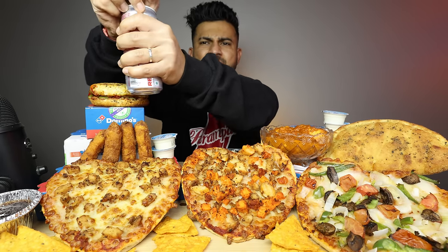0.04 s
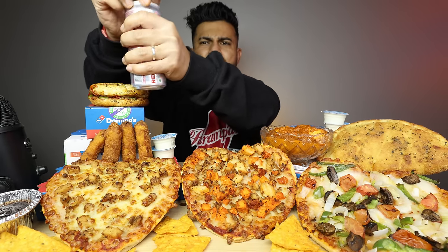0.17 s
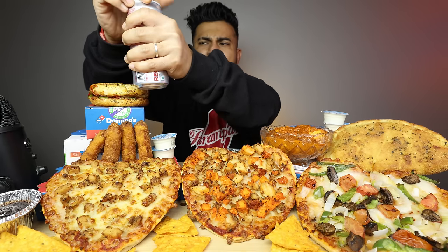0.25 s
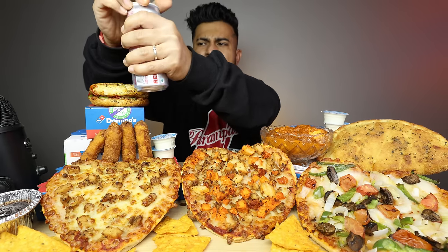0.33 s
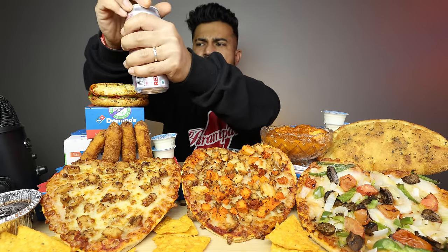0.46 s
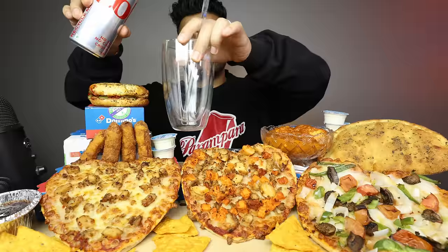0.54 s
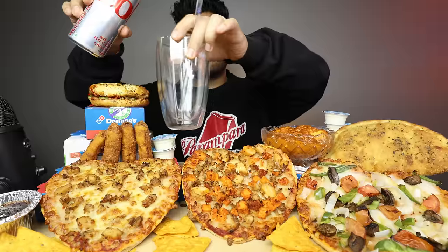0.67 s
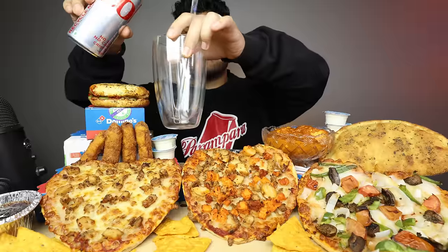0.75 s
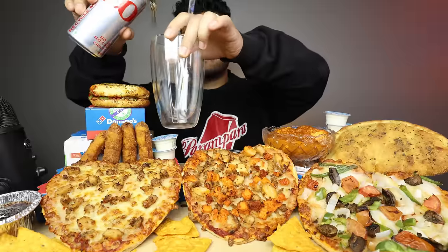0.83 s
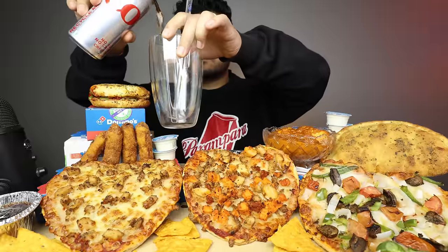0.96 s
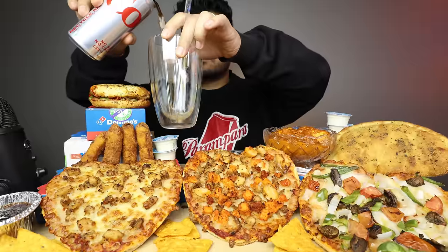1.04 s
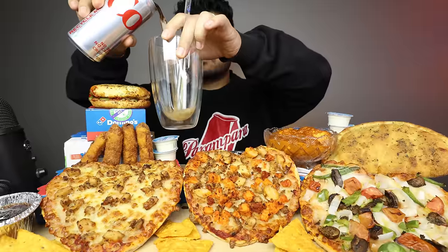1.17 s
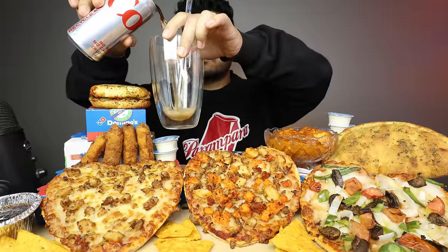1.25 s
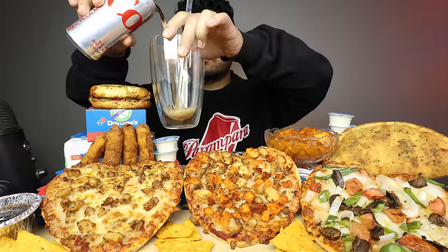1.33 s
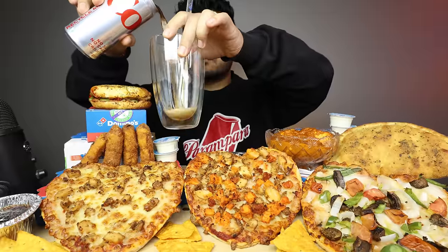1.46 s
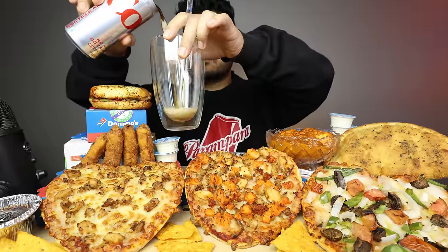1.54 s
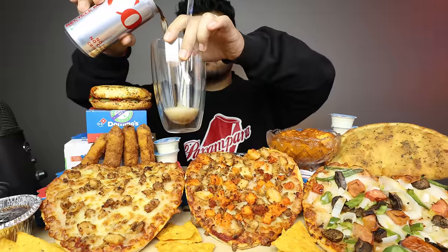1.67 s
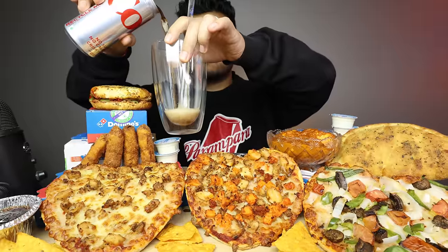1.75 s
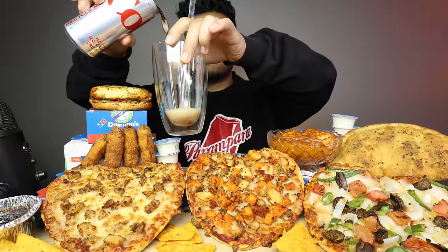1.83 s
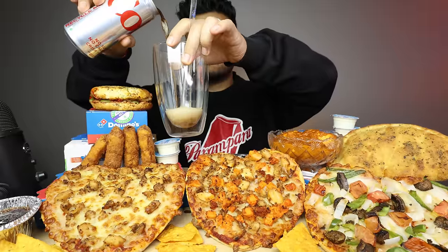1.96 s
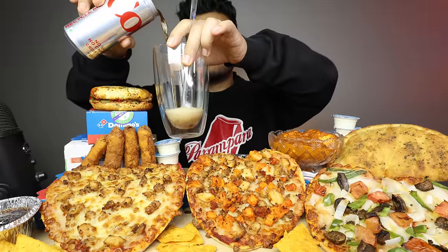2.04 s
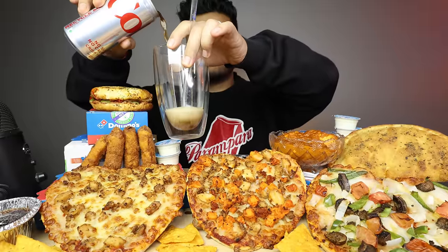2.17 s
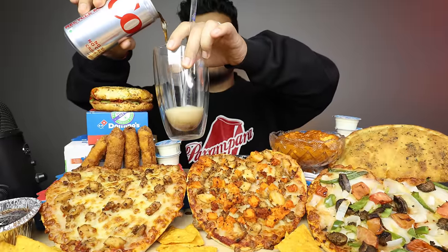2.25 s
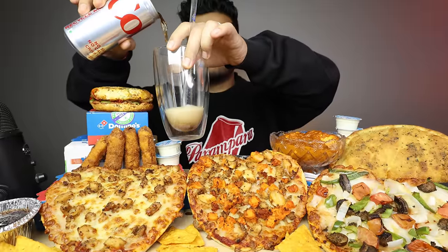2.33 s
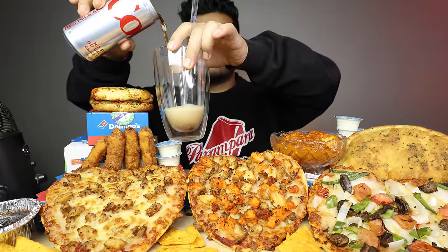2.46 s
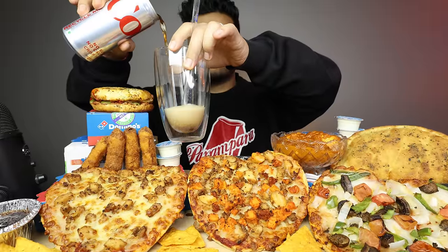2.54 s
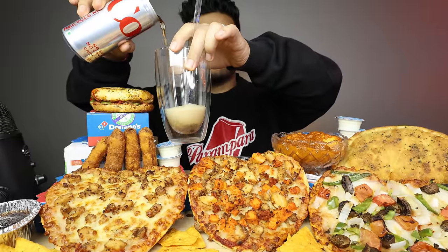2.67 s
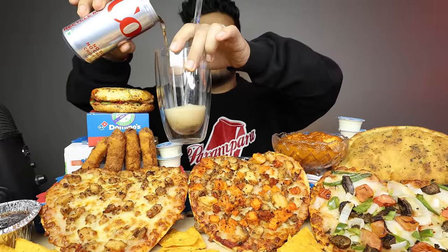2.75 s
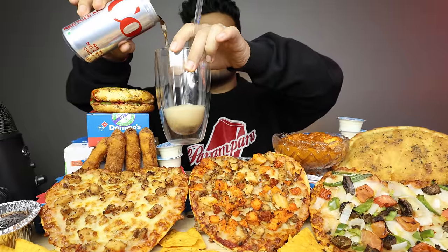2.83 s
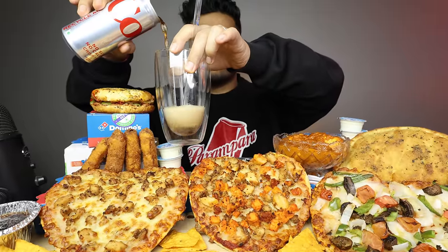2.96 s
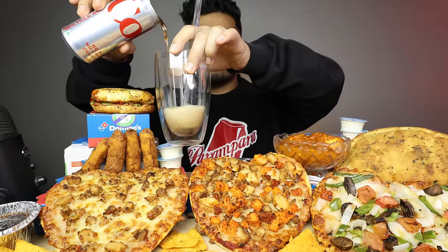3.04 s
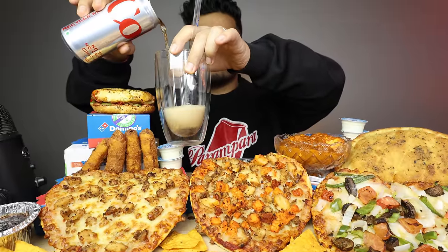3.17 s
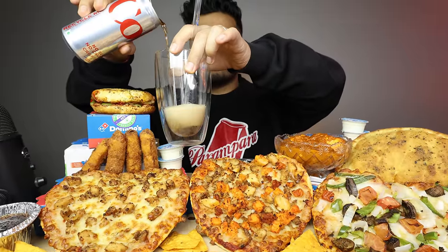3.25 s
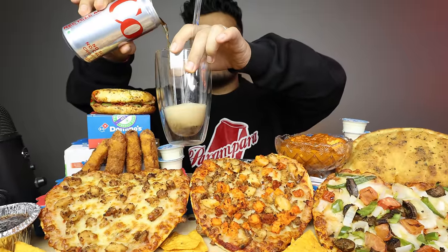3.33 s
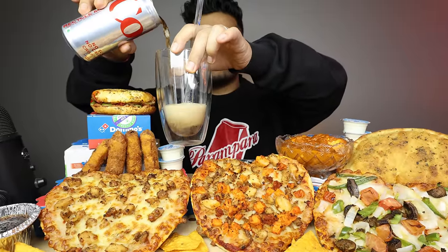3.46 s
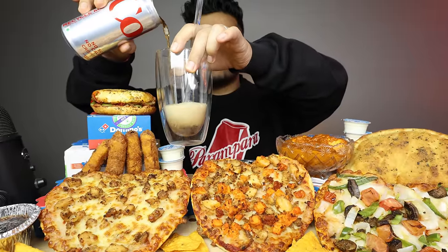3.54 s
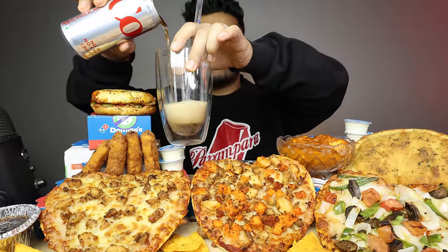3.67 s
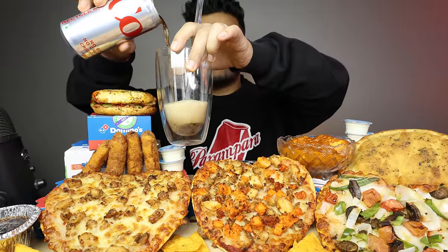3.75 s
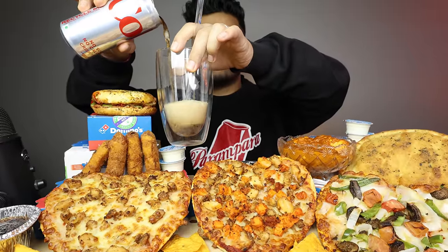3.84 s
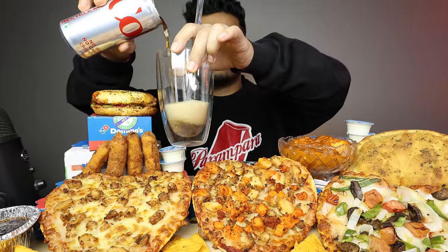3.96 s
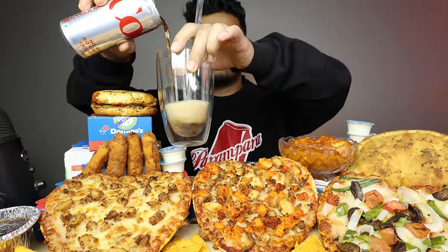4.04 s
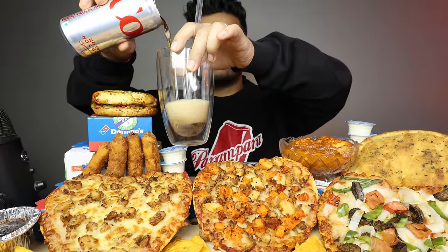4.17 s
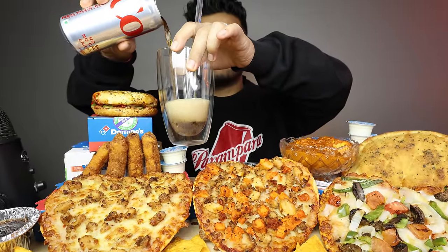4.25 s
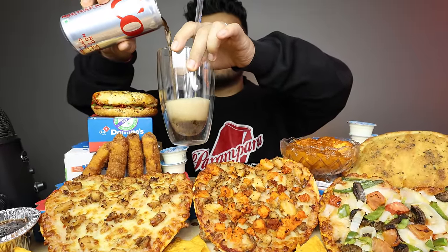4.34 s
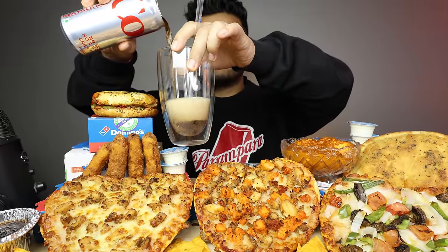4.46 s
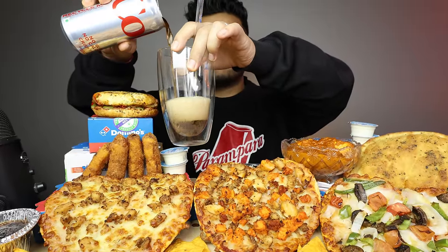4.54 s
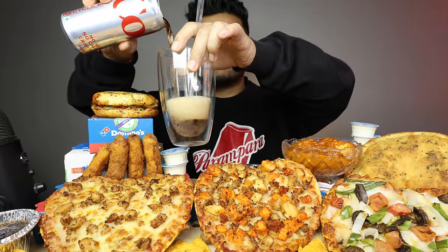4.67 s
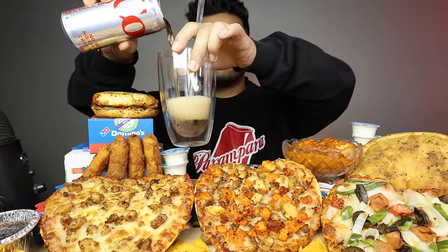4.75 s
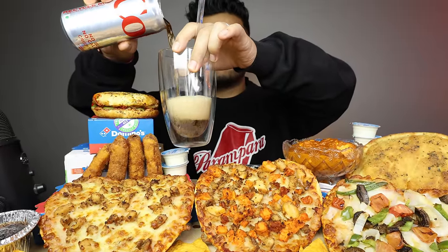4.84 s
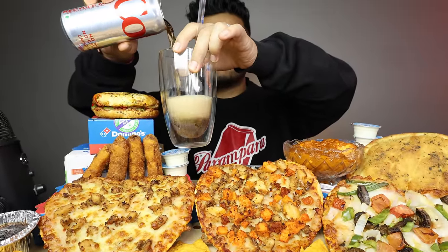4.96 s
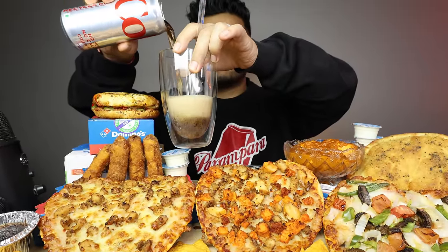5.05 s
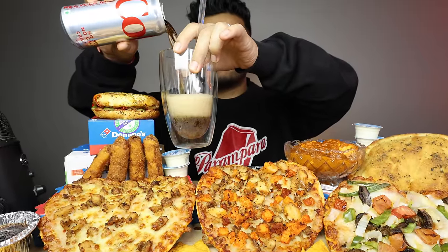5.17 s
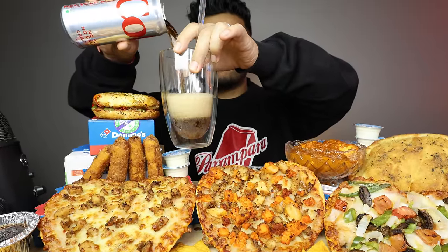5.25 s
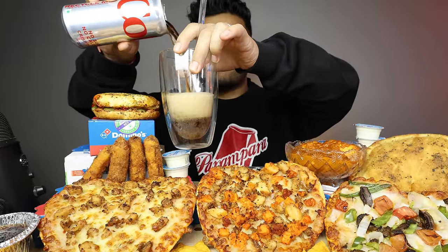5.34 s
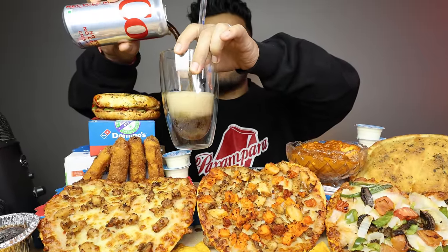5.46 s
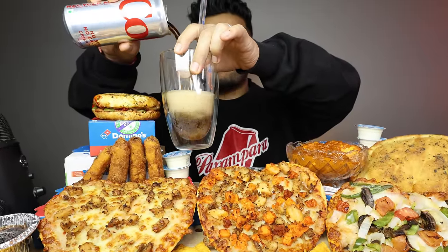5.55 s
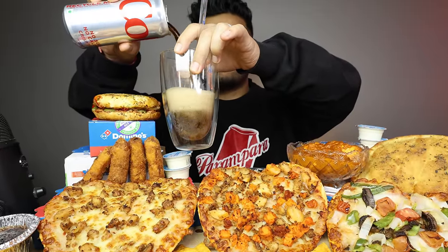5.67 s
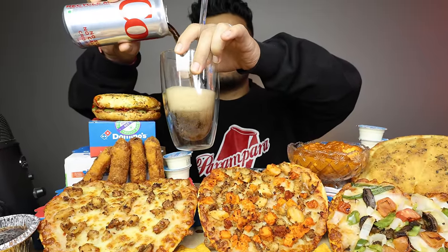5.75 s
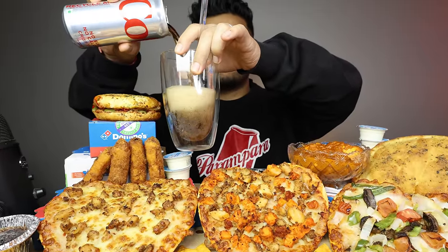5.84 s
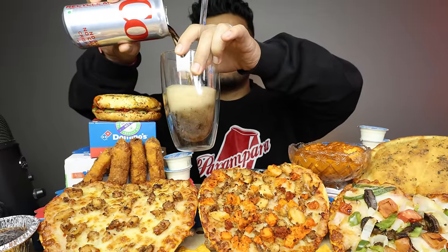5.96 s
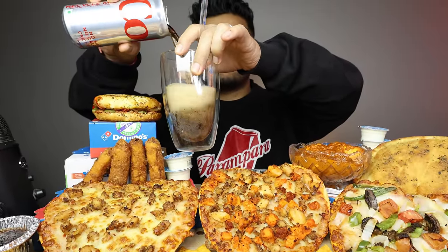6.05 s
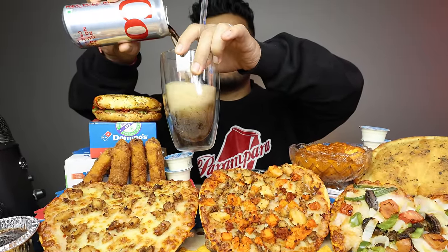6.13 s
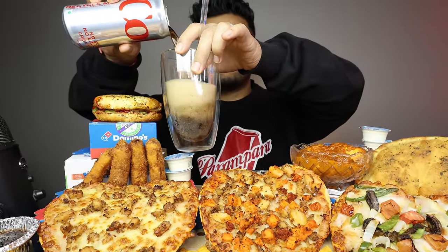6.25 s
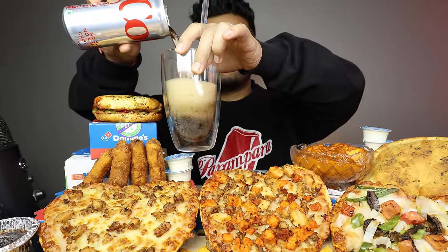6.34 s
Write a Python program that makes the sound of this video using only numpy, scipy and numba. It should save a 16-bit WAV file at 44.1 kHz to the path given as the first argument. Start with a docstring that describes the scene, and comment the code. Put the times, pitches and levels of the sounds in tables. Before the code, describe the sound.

A pressurised can bursts with a short bright hiss, ticks, then cracks open very loudly, stopping abruptly. Following a pause, a thin stream patters on bare glass, then lumpy hollow plops come thick and fast, gradually sparser, shorter and higher as the glass fills. Carbonation crackles and brightens until the end. Close, dry microphone, slightly overloaded on the crack, over quiet indoor rumble.

```python
"""A drink can opens with a hiss of shaped noise, its lid snaps as dying tones and tears as dense clicks, then stops
abruptly. Later a drink is poured into a tall glass: spatter and drops tick on it, lumps plop by exciting a resonant
air column that rings higher as the glass fills, and a hiss of bubble clicks grows brighter as the foam rises.
A straw then clinks once as a set of damped modes; the foam shortens the ringing of the plops.
A quiet rumble and mains hum last throughout; overload clips the peaks and a low-pass removes the top."""
import sys
import numpy as np
from scipy import signal
from scipy.fft import rfft, irfft
from scipy.io import wavfile
from numba import njit

SR = 44100
rng = np.random.default_rng(int(sys.argv[2]) if len(sys.argv) > 2 else 0)


def to_wav(sig):
    """Store sig (one row per channel, or 1-D mono) as 16-bit WAV at the path in sys.argv[1].

    Samples outside -1..1 are clipped; the rate is SR.
    """
    pcm = np.clip(np.atleast_2d(sig), -1, 1) * 32767
    pcm = np.round(pcm).astype(np.int16)
    wavfile.write(sys.argv[1], SR, pcm.T)  # frames by channels


N = 282240

# Spectrum of the room rumble: f/Hz, relative level/dB per Hz
ROOM_SPECTRUM = [(12, -41), (20, -9), (90, -9), (133, -15.5), (180, -12.5), (267, -16.5), (1000, -27),
                 (15500, -39.5)]
# Mains hum: f/Hz, mean level/dB rms
MAINS_HUM = [(49, -53.5)]
# Spectrum of the opening hiss: f/Hz, relative level/dB per Hz
VENT_SPECTRUM = [(300, -19.5), (620, -5.5), (985, -7), (1800, 0), (2500, -6.5), (3500, -4.5), (4100, 1.5),
                 (5700, -3), (6400, -1), (7500, -1.5), (10500, -14.5), (15500, -23)]
# Can resonances in the hiss: f/Hz, width/Hz, relative level/dB
CAN_MODES = [(1860, 130, 0), (4190, 24, 2), (5100, 32, 0), (5800, 38, -3.5), (6700, 41, -1)]
# Hiss by band: low f/Hz, high f/Hz, burst level/dB, fall/(dB per s), seeping level/dB, second puff level/dB
HISS_BANDS = [(200, 3440, -12, 130, -44, -44), (3630, 8130, -3.5, 151, -42, -38),
              (7200, 10500, -6, 171, -39, -32), (10500, 14400, -12, 256, -55, -40)]
# Tab and lid snapping: t/s, level/dB of the tone at its onset, f/Hz
LID_SNAPS = [(0.1637, -14.5, 2180), (0.1768, -15, 1890), (0.3665, -27, 1070), (0.4414, -4.5, 3080),
             (0.4495, -6, 3300), (0.4725, 11, 2940), (0.4775, 9, 1454)]
# Spectrum of the tearing lid: f/Hz, relative level/dB per Hz
TEAR_SPECTRUM = [(400, -32), (1050, 0), (1280, 3), (1690, 4.5), (2330, -7), (3210, -11.5), (5570, -21),
                 (7120, -12.5), (15500, -39)]
# Lowest resonance of the air above the drink: t/s, f/Hz
AIR_RESONANCE = [(1.1, 655), (1.9, 648), (2.4, 745), (4.4, 794), (5.4, 980), (6.4, 1220)]
# Force of the stream as heard through the foam: t/s, spray level/dB
STREAM_FORCE = [(1.1, -53), (1.29, -32), (1.44, -24.5), (1.66, -31.5), (2.16, -34.5), (2.9, -35.5),
                (3.24, -34), (3.55, -39.5), (4.2, -37), (4.6, -45), (5.3, -48), (6.4, -52.5)]
# Spectrum of the spray: f/Hz, relative level/dB per Hz
SPRAY_SPECTRUM = [(700, -6.5), (1100, -5), (2100, -2), (5000, -16), (8000, -9.5), (15500, -42)]
# Drops bursting on the glass: t/s, level/dB of the tone at its onset, f/Hz
GLASS_DROPS = [(1.1147, -13.5, 9100), (1.1424, -19, 8900), (1.1822, -8.5, 9000), (1.1966, -13, 2040),
               (1.2763, -13, 8900), (1.2919, -14, 3040), (1.3209, -12, 3080), (1.356, -8.5, 1760),
               (1.3727, -21, 2940), (1.3972, -9, 2260), (1.4074, -8.5, 1830), (1.486, -19, 3120),
               (1.5513, -9, 1980), (1.6198, -12.5, 1850), (1.6488, -10, 1900), (2.353, -18, 4080),
               (2.38, -17, 2270), (2.3939, -12, 2127), (2.4548, -12, 2080), (2.6063, -13, 4530),
               (2.6981, -18, 4500), (2.7551, -14, 2070), (2.7733, -11.5, 2350), (3.0053, -9.5, 2230),
               (3.051, -15, 2220), (3.2146, -13, 2300), (3.273, -13, 2300), (3.932, -18, 3830)]
# Overtones of the air column, a tube closed at one end: multiple of the lowest f, level/dB
AIR_OVERTONES = [(2.952, -30.5), (4.9, -35.5), (6.6, -26.5)]
# Cancellations by echoes off the table: f/Hz, width/Hz
TABLE_DIPS = [(450, 58), (1550, 357), (1960, 170), (5950, 180)]
# Lumps of the stream landing: t/s, level/dB of the blow
LUMP_LANDINGS = [(1.1724, -12), (1.3554, -10.5), (1.3972, -14), (1.4552, -7), (1.5028, -9.5),
                 (1.5254, -10.5), (1.554, 1), (1.5786, -2), (1.5932, -2.5), (1.62, -5), (1.6382, -4.5),
                 (1.649, -4), (1.6873, -2.5), (1.706, -8), (1.732, -3), (1.74, 7.5), (1.76, -1.5),
                 (1.793, -6), (1.805, -9), (1.8444, -4), (1.8732, -11), (1.892, -8), (1.9647, -1.5),
                 (1.982, -7), (1.9981, -4.5), (2.0864, -7.5), (2.1695, -6.5), (2.2361, -11.5), (2.2525, -7),
                 (2.275, -16), (2.3045, -5.5), (2.3327, -8), (2.3525, -10), (2.38, -7), (2.3854, -9),
                 (2.408, -11.5), (2.432, -12), (2.441, -8), (2.486, -7), (2.508, -4), (2.5275, -1.5),
                 (2.554, -6.5), (2.564, -10), (2.606, -12), (2.632, -8.5), (2.67, -12), (2.7095, -6.5),
                 (2.7385, -8.5), (2.7556, -10.5), (2.774, -12), (2.7912, -15), (2.8254, -21), (2.8685, -12),
                 (2.9838, -7.5), (3.0764, -2), (3.103, -7), (3.113, -6.5), (3.1267, -9.5), (3.1753, -5.5),
                 (3.233, -11.5), (3.2729, -10), (3.306, -6.5), (3.324, -7.5), (3.338, -11), (3.3611, -13),
                 (3.3842, -12.5), (3.4039, -16), (3.4095, -15), (3.4266, -13.5), (3.4512, -14),
                 (3.5128, -18), (3.6015, -15.5), (3.651, -13), (3.6647, -12), (3.6871, -5.5), (3.703, -11),
                 (3.7887, -11.5), (3.8711, -5), (3.9314, -13), (3.9912, -11.5), (4.15, -7), (4.1631, -14),
                 (4.1858, -16), (4.2054, -20), (4.3036, -21), (4.3193, -16), (4.4262, -10), (4.435, -12.5),
                 (4.4538, -14.5), (4.609, -15), (4.7596, -15), (4.9758, -23.5), (5.2494, -24)]
# Spectrum of the foam: f/Hz, relative level/dB per Hz
FOAM_SPECTRUM = [(880, -44), (1500, -8), (1650, -3.5), (2970, -3), (3580, -1), (6570, -5), (7990, -4.5),
                 (10700, -19.5), (15500, -13.5)]
# Modes of the straw: f/Hz, relative level/dB, t60/s
STRAW_MODES = [(1036, -7.5, 0.054), (2437, -8.5, 0.084), (3920, -1, 0.044), (4340, 3.5, 0.017),
               (5550, 5, 0.014), (7180, 0, 0.0083), (9300, -10.5, 0.018), (13040, -23, .03)]

ROOM_DB = -41.5
# The can: its resonances against the hiss, and a second puff; seeping ends as the tab breaks in
CAN_DB, PUFF_S, PUFF_WIDTH_S, SEAL_GIVES_S = -8, 0.269, 0.032, 0.441
# The tear: a falling scrape under a swell up to the rip, then a steep snap-off over a falling tail
SCRAPE_DB, SCRAPE_DB_PER_S, SWELL_DB_PER_S = -24, 500, 804
RIP_S, RIP_DB, SNAP_DB_PER_S = 0.481, -2, 3000
TAIL_DB, TAIL_DB_PER_S, TEAR_END_S = -13, 154, 0.584
POUR_S = 1.112
# Fine spatter off the bare bottom, fading as the pool forms
SPATTER_DB, SPATTER_DB_PER_S = -35.5, 17.5
# Foam damps the glass: t60 when empty/s, t60 under foam/s, time constant/s
AIR_DAMPING, SINK_DAMPING = (0.051, 0.0069, 0.53), (0.031, 0.0023, 0.39)
# The pool is complete at POOL_S, after rising for POOL_RISE_S; the thud is weak on the bare bottom
POOL_S, POOL_RISE_S, THUD_DB, DRY_THUD_DB = 2.09, 0.38, -10, -59
THUD_HZ, THUD_T60_S = 330.5, 0.026
# A lump slapping the pool, its level against the thud
SLAP_DB, SLAP_HZ, SLAP_T60_S, SLAP_LAG_S = 8.5, 1070, 0.00055, 0.00081
# Small plops against the spray; weaker until the drink is deep enough
SMALL_PLOPS_DB, SHALLOW_DB_PER_S, DEEP_S = -8.5, 77, 1.72
# Foam at the first landing and its growth; froth whipped by the stream, against the spray; treble gain
FOAM_DB, FOAM_DB_PER_S, FROTH_DB, BRIGHTEN_DB_PER_S = -42.5, 1.62, -12, 1.0
CLINK_S, CLINK_LENGTH_S, CLINK_DB, CLINK_DB_PER_S = 2.962, 0.031, -31.5, 450
CUTOFF_HZ = 15700


def from_db(db):
    """An amplitude ratio is exponential in its level: 20 dB per factor of ten."""
    return 10 ** (np.asarray(db) / 20)


def add_db(*levels_db):
    """Unrelated sounds add in power, not in amplitude."""
    return 10 * np.log10(sum(from_db(db) ** 2 for db in levels_db))


def rms_one(x):
    """Mean power is normalised, giving an rms of 1."""
    return x / np.sqrt(np.mean(x ** 2) + 1e-20)


def in_time(rows):
    """Linear interpolation carries each column of a curve to every sample."""
    s, *columns = np.transpose(rows)
    return [np.interp(np.arange(N) / SR, s, column) for column in columns]


def colour(x, spectrum):
    """Weighting in the frequency domain, linear in dB over log f, shapes a spectrum; rms 1."""
    hz, db = np.transpose(spectrum)
    grid = np.maximum(np.arange(N // 2 + 1) * SR / N, 1)
    gain = from_db(np.interp(np.log(grid), np.log(hz), db))
    return rms_one(irfft(rfft(x) * gain, N))


def band(x, low_hz, high_hz):
    """A third-order Butterworth response passes one band."""
    return signal.sosfilt(signal.butter(3, [low_hz, high_hz], "band", fs=SR, output="sos"), x)


def drift(rate):
    """Two equal poles near rate (Hz) smooth white noise into a slow fluctuation; rms 1."""
    r = np.exp(-2 * np.pi * rate / SR)
    noise = rng.standard_normal(N + SR)
    settled = signal.lfilter([1], [1, -2 * r, r * r], noise)[SR:]
    return rms_one(settled)


def grains(per_s, spread_db):
    """A random impulse train has independent times, sizes and signs; rms 1."""
    sizes = from_db(spread_db * np.minimum(rng.exponential(1, N), 4))
    signs = rng.choice([-1, 1], N)
    return rms_one(sizes * signs * (rng.random(N) < per_s / SR))


def clicks(times, db):
    """A single-sample impulse excites all frequencies equally."""
    out = np.full(N, 1e-18)
    out[np.round(np.asarray(times) * SR).astype(int)] = from_db(db)
    return out


@njit
def ring(x, hz, t60, sr):
    """A two-pole resonator answers a unit impulse with a decaying sine; f and t60 may move."""
    out = np.zeros(len(x))
    for i in range(2, len(x)):
        r = 1000 ** (-1 / (t60[i] * sr))
        w = 2 * np.pi * hz[i] / sr
        out[i] = np.sin(w) * x[i - 1] + 2 * r * np.cos(w) * out[i - 1] - r * r * out[i - 2]
    return out


def pings(rows, ring_t60, rattle_db, rattle_t60):
    """Each impact is a tick, a decaying mode and a decaying noise band around that mode."""
    out, t = np.zeros(N + 2048), np.arange(2048) / SR
    puffs = rng.standard_normal((len(rows), 2048))
    for (s, db, hz), puff in zip(rows, puffs):
        tick = 1.25 * (t == 0)
        tone = np.sin(2 * np.pi * hz * t) * from_db(-60 * t / ring_t60)
        edges_hz = [0.5 * hz, min(2.58 * hz, 0.4 * SR)]
        puff = signal.sosfilt(signal.butter(2, edges_hz, "band", fs=SR, output="sos"), puff)
        rattle = from_db(rattle_db - 60 * t / rattle_t60) * rms_one(puff)
        at = round(s * SR)
        out[at:at + 2048] += from_db(db) * (tone + tick + rattle)
    return out[:N]


def room():
    """Ambient sound is broadband noise of low pitch plus a mains tone of wandering level."""
    t = np.arange(N) / SR
    hum = sum(np.sqrt(2) * from_db(db + 3.9 * drift(5.9)) * np.sin(2 * np.pi * hz * t)
              for hz, db in MAINS_HUM)
    return from_db(ROOM_DB + 0.95 * drift(0.88)) * colour(rng.standard_normal(N), ROOM_SPECTRUM) + hum


def opening_hiss(t):
    """The hiss is noise with can resonances, dying away like a crack's tail in a room, treble fastest."""
    noise = rng.standard_normal(N)
    resonant = sum(from_db(db) * signal.lfilter(*signal.iirpeak(hz, hz / width_hz, SR), noise)
                   for hz, width_hz, db in CAN_MODES)
    hiss = colour(noise, VENT_SPECTRUM) + from_db(CAN_DB - 50 * t) * rms_one(resonant)
    puff_fall_db = 10 * np.minimum(((t - PUFF_S) / PUFF_WIDTH_S) ** 4, 20)
    out = np.zeros(N)
    for low, high, burst_db, fall, seep_db, puff_db in HISS_BANDS:
        level_db = add_db(np.maximum(burst_db - fall * t, -200), seep_db, puff_db - puff_fall_db)
        out += from_db(level_db + 0.57 * drift(60)) * rms_one(band(hiss, low, high))
    return out * (t < SEAL_GIVES_S)


def slow_offset(t):
    """A slow, inaudible offset at the start decays back past zero: two opposed exponentials."""
    return -0.25 * np.exp(-t / 0.058) + 0.066 * np.exp(-t / 0.35)


def tear(t):
    """Stick-slip tearing is a dense train of slips; the harder the tear, the more the metal bites."""
    slips = colour(grains(3800, spread_db=1.5), TEAR_SPECTRUM)
    since = np.clip(t - RIP_S, -0.1, 0.2)
    before = since < 0
    rip_db = RIP_DB + np.where(before, SWELL_DB_PER_S, -SNAP_DB_PER_S) * since
    scrape_db = SCRAPE_DB - SCRAPE_DB_PER_S * np.clip(t - SEAL_GIVES_S, 0, 1)
    tail_db = TAIL_DB - TAIL_DB_PER_S * since
    tear_db = add_db(rip_db, np.where(before, scrape_db, tail_db))
    # bite rises more than twice as fast in dB as the tear
    bite = from_db(2.26 * tear_db - 6.5) * rms_one(band(slips, 2210, 4650))
    tearing = (t > SEAL_GIVES_S) & (t < TEAR_END_S)
    return tearing * (from_db(tear_db) * slips + bite)


def opening():
    """Independent sources superpose: the can hisses, the lid snaps and then tears."""
    t = np.arange(N) / SR
    snaps = pings(LID_SNAPS, ring_t60=0.0095, rattle_db=2.0, rattle_t60=0.0045)
    return opening_hiss(t) + slow_offset(t) + snaps + tear(t)


def spatter(poured_s):
    """Liquid shattering on bare glass is a clumped train of bright noise bursts."""
    ticks = grains(1500 * from_db(5.0 * drift(41)), spread_db=3.5)
    tails = signal.lfilter([1], [1, -0.95], np.abs(ticks)) * rng.standard_normal(N)
    level = from_db(SPATTER_DB - SPATTER_DB_PER_S * poured_s)
    return (poured_s > 0) * level * rms_one(band(tails, 4600, 13000))


def spray(spray_db):
    """Each droplet excites one of 14 resonances for a few cycles; the droplets come in clumps."""
    ticks = grains(1300 * from_db(4.5 * drift(30)), spread_db=5.5)
    dealt = rng.integers(0, 14, N)  # which pitch each tick gets
    rings = np.zeros(N)
    for k, hz in enumerate(np.geomspace(1000, 11000, 14)):
        rings += ring(ticks * (dealt == k), np.full(N, hz), np.full(N, 4.9 / hz), SR) * np.sqrt(hz)
    return from_db(spray_db) * colour(rings, SPRAY_SPECTRUM)


def glass(x, air_hz):
    """Sharp sounds inside a closed tube excite its overtones."""
    return x + sum(from_db(db) * ring(x, multiple * air_hz, np.full(N, 0.008), SR)
                   for multiple, db in AIR_OVERTONES)


def table(x):
    """Interference with echoes off the table partly cancels narrow bands."""
    for hz, width_hz in TABLE_DIPS:
        x = 0.3 * x + 0.68 * signal.lfilter(*signal.iirnotch(hz, hz / width_hz, SR), x)
    return x


def fizz(foam_db, air_hz, air_t60, poured_s):
    """Countless bubble impulses blur to a hiss that the air column's resonance colours."""
    bubbles = grains(9000, spread_db=3.5)
    column = rms_one(band(ring(bubbles, air_hz, 0.83 * air_t60, SR), 480, 1500))
    foam = colour(bubbles, FOAM_SPECTRUM) + from_db(0.5) * column
    # the treble gains as the foam nears the rim
    foam = foam + (from_db(BRIGHTEN_DB_PER_S * poured_s) - 1) * band(foam, 6820, 14800)
    return from_db(foam_db + 0.77 * drift(22)) * foam


def plops(small_db, air_hz, air_t60, sink_t60, thud_db):
    """Each impact excites the air column, a thud and slap in the drink, and cracks at its surface."""
    s, db = np.transpose(LUMP_LANDINGS)
    small = from_db(small_db + 0.5 * drift(11)) * np.abs(grains(380, spread_db=3.0))
    blows = clicks(s, db) + small
    air_hz = air_hz * from_db(0.3 * drift(30))  # the churning surface bends the pitch
    struck = ring(blows, air_hz, air_t60, SR)
    # a second pass rounds the attack, as the lump takes time to sink; the factor keeps the peak at 1
    even = 2 * np.log(1000) / SR * (1 / sink_t60 + (np.e - 1) / air_t60)
    column = even * ring(struck, air_hz, sink_t60, SR)
    thud_hz = THUD_HZ * from_db(0.79 * drift(15.7))
    thud = ring(blows * from_db(thud_db), thud_hz, np.full(N, THUD_T60_S), SR)
    late = np.roll(blows, round(SLAP_LAG_S * SR)) * from_db(thud_db + SLAP_DB)
    slap = ring(late, np.full(N, float(SLAP_HZ)), np.full(N, SLAP_T60_S), SR)
    # lumps crack unevenly just after landing, more as the drink gets deeper
    lump_cracks = clicks(s + 0.00084, db - 3 + rng.normal(0, 2.5, len(s)))
    small_cracks = 1.1 * np.roll(small, round(0.001 * SR))
    cracks = from_db(0.5 * thud_db) * (lump_cracks + small_cracks)
    noise_tails = signal.lfilter([1], [1, -0.97], cracks) * rng.standard_normal(N)
    splash = cracks + from_db(-3.5) * noise_tails
    return band(slap - column - thud, 129, 6200), band(splash, 410, 7000)


def straw():
    """Brief rattling contact on the wall excites the straw's modes, which a hand damps."""
    since = np.arange(N) / SR - CLINK_S
    touching = (since > 0) & (since < CLINK_LENGTH_S)
    level = from_db(CLINK_DB - CLINK_DB_PER_S * since * touching)
    touches = touching * level * grains(2500, spread_db=1.0) + 1e-18
    return sum(ring(from_db(db) * touches, np.full(N, float(hz)), np.full(N, t60), SR)
               for hz, db, t60 in STRAW_MODES)


def scene():
    """Sound pressures superpose: can, pour and straw add to the quiet room."""
    t = np.arange(N) / SR
    poured_s = np.maximum(t - POUR_S, 0)
    air_hz, = in_time(AIR_RESONANCE)
    air_t60, sink_t60 = (foamed + (empty - foamed) * np.exp(-poured_s / settle)
                         for empty, foamed, settle in (AIR_DAMPING, SINK_DAMPING))
    thud_db = np.interp(t, [POOL_S - POOL_RISE_S, POOL_S], [DRY_THUD_DB, THUD_DB])
    spray_db, = in_time(STREAM_FORCE)
    small_db = spray_db + SMALL_PLOPS_DB - SHALLOW_DB_PER_S * np.maximum(DEEP_S - t, 0)
    foam_db = add_db(FOAM_DB + FOAM_DB_PER_S * poured_s, spray_db + FROTH_DB)
    gurgle, splash = plops(small_db, air_hz, air_t60, sink_t60, thud_db)
    drops = pings(GLASS_DROPS, ring_t60=0.0076, rattle_db=-6.0, rattle_t60=0.017)
    crackle = (t > POUR_S) * glass(splash + drops + spray(spray_db), air_hz)
    foam = (t > POUR_S) * fizz(foam_db, air_hz, air_t60, poured_s)
    pour = table(gurgle + crackle + foam + spatter(poured_s))
    return (room() + opening() + pour + straw())[None]


def record(dry):
    """Overload clips the loudest peaks; a steep elliptic low-pass then cuts the top."""
    low_pass = signal.ellip(12, 0.5, 80, CUTOFF_HZ, fs=SR, output="sos")
    return signal.sosfilt(low_pass, np.clip(dry, -1, 1))


dry = scene()
out = record(dry)
to_wav(out)
```